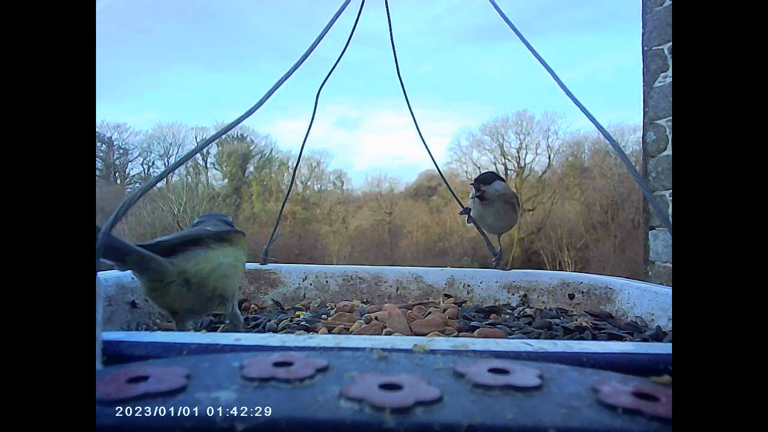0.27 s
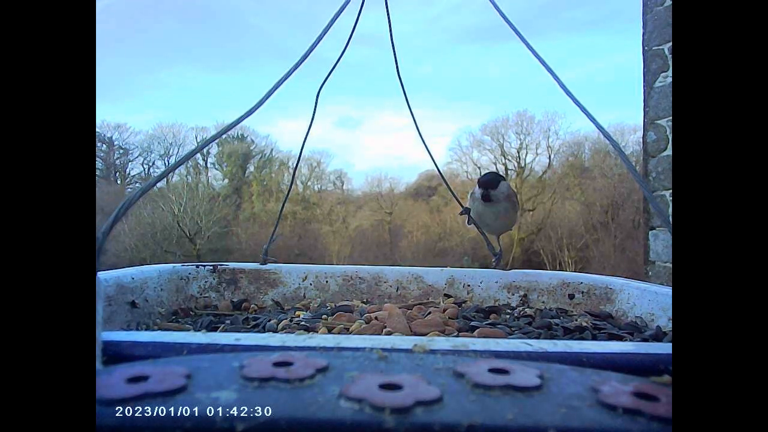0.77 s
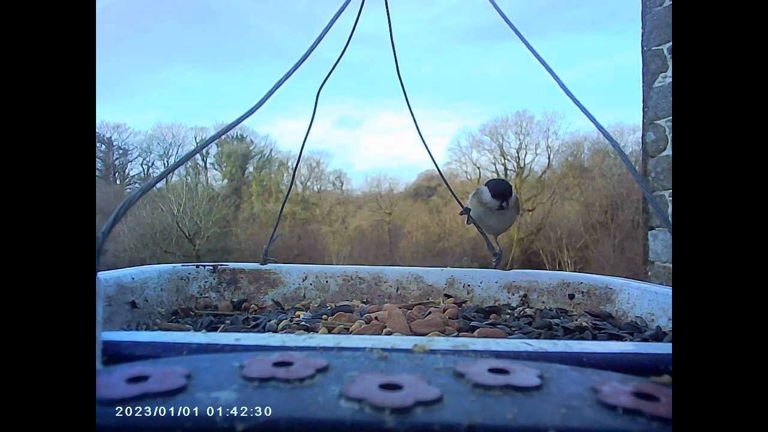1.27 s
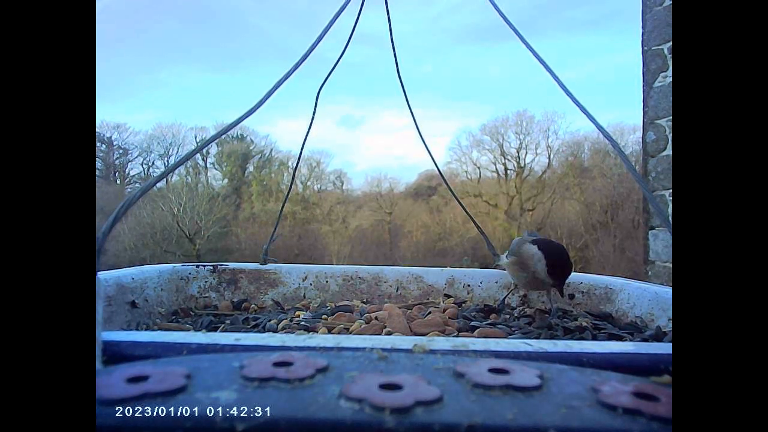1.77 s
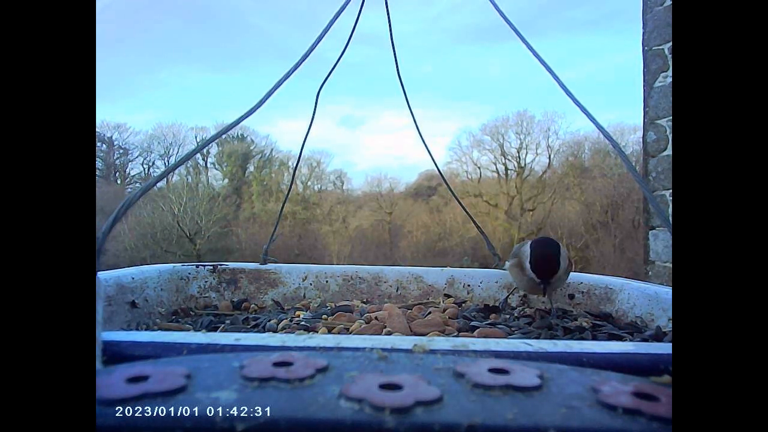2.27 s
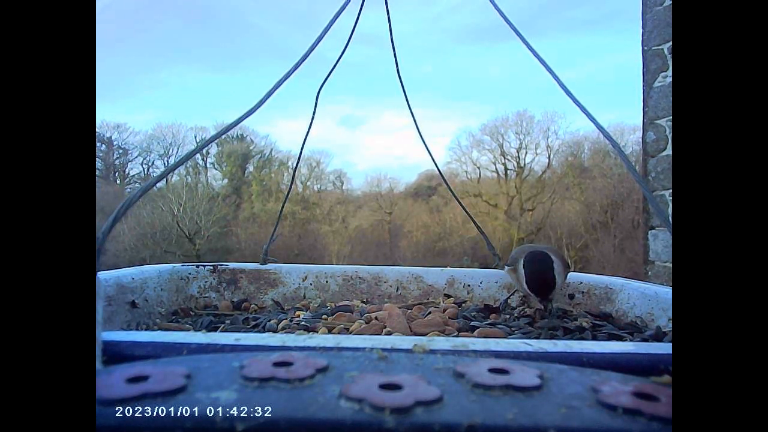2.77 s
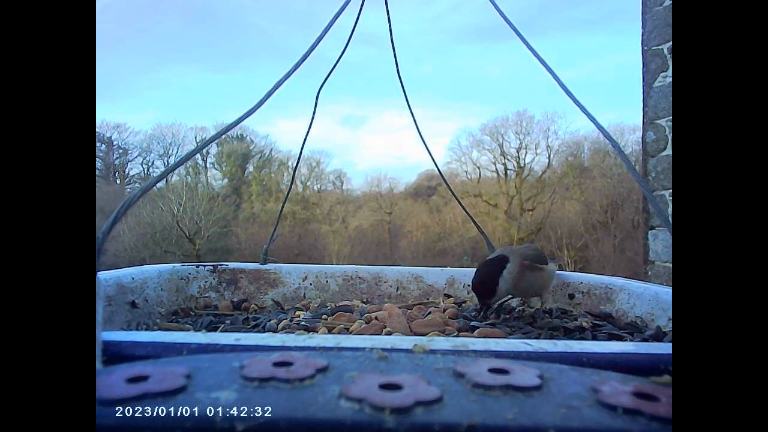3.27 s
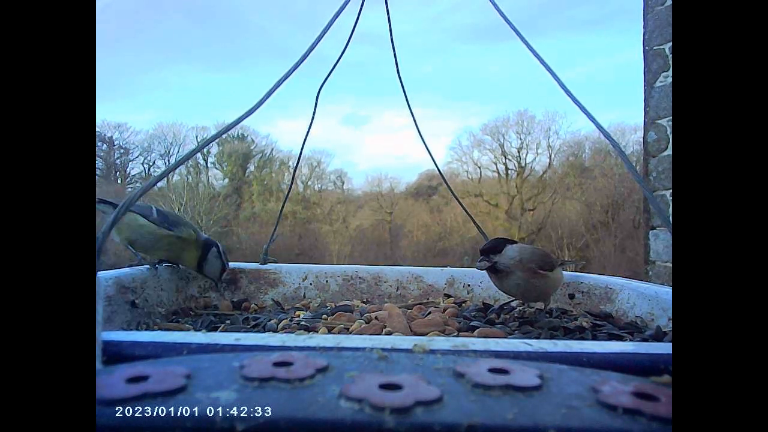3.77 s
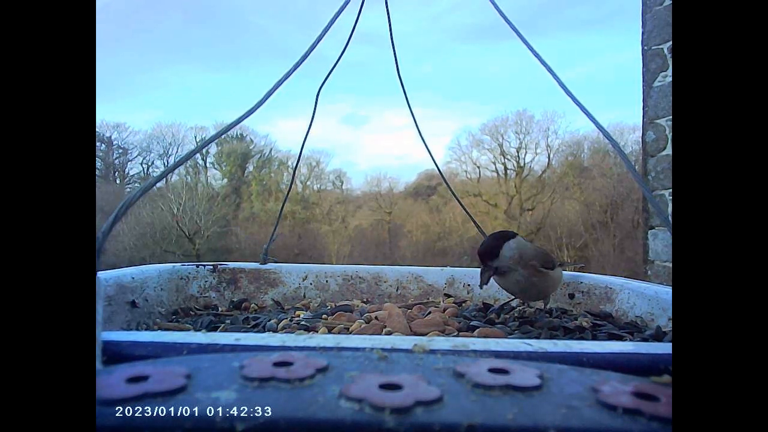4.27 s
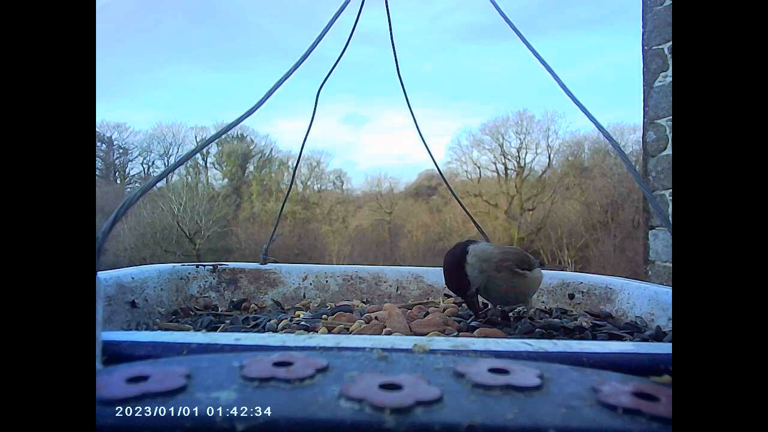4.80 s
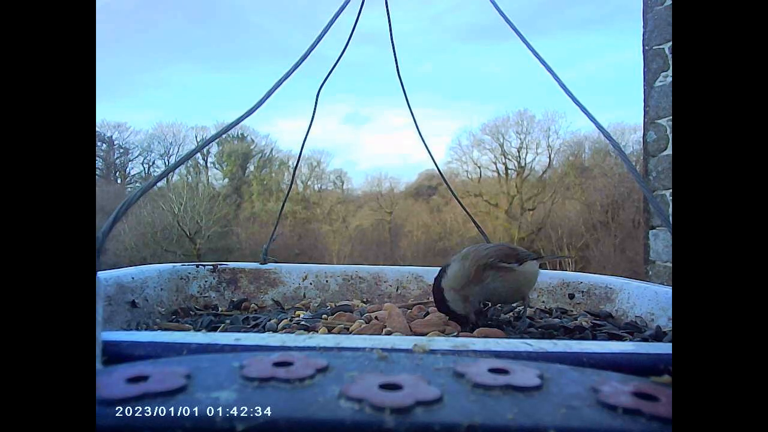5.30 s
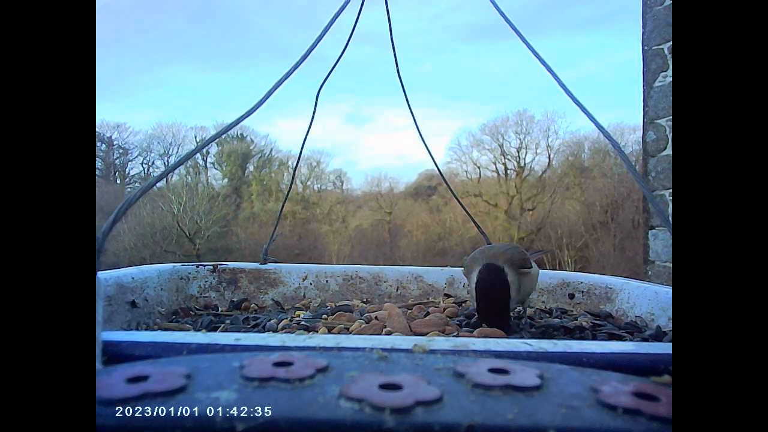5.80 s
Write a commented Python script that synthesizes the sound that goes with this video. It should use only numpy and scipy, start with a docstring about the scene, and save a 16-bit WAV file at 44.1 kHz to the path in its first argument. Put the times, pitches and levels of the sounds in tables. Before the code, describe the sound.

Throughout, soft low air noise, faint camera hiss and a very thin whine lie under distant, high, quick warbling with a slight echo from trees. At 0.1-0.4 s there are faint seed rustles, light touches and a small hoarse call. From 0.45 to 0.8 s wings buffet the microphone in a rapid low flutter. Metallic taps follow at 0.8-1.7 s, brightest with a husk snap near 1.6, and a quiet dipping call at 1.16. Clusters of pecks ring the tin around 2.0-2.2 and 2.6-2.9 s, with a low jolt near 2.7. Dense taps run 3.25-3.95 s: a clear high chirp at 3.4, brief wings, a sharp husk crack at 3.49, rustling and flicked seeds. Another tiny flutter comes at 4.2, then firm knocks at 4.35-4.7 with a low sway. Last taps fall near 5.1, a faint snap at 5.4, then distant song to 6 s.

```python
"""Small birds hop and peck in a hanging metal seed tin, right beside a little camera.
Throughout: light air and camera hiss (shaped noise), a thin whine (sines), a far song (gliding tones).
Soon feet rustle the seed (noise), beaks and claws ring the tin (decaying modes) and husks snap (noise bursts).
Near birds then call (gliding tones), and wings buffet the microphone (pulse trains with noise).
From the middle on, flicked seeds tick (light contacts) and the tin jolts low as it sways (swells of low noise)."""
import sys
import numpy as np
from scipy import signal
from scipy.fft import rfft, irfft, next_fast_len
from scipy.io import wavfile
from scipy.ndimage import map_coordinates

SR = 44100
rng = np.random.default_rng(int(sys.argv[2]) if len(sys.argv) > 2 else 0)


def digitize_waveform(pressure):
    """Quantize a signal to 16-bit integers and store it at the path in sys.argv[1].

    Rows of a 2-D input are taken as channels; values are limited to [-1, 1].
    """
    field = np.atleast_2d(pressure).T
    bounded = np.clip(field, -1, 1)
    quanta = np.round(bounded * 32767).astype(np.int16)
    wavfile.write(sys.argv[1], SR, quanta)


N = 266496
TOP_HZ = 8800  # upper band limit

# Bursts of flight. Each row: first and last beat in seconds, beats per second, strongest moment in seconds
# (held inside the burst), relative level in dB, wake relative to push in dB.
FLIGHTS = [(0.451, 0.793, 23.9, 0.52, -45.5, -11), (3.338, 3.439, 26.4, 3.6, -45, -17.5),
           (4.177, 4.294, 24.5, 4.14, -45.5, -9)]
# A bird shuffles through the seed. Each row: start and end in seconds, relative level in dB,
# seeds flicked (count before rounding).
SHUFFLES = [(0.142, 0.209, -72, 0), (0.31, 0.435, -76.5, 0.5), (3.451, 3.721, -70.5, 2),
            (3.747, 3.866, -67, 0), (3.96, 4.309, -75, 3), (4.885, 4.93, -72.5, 0)]


def amp(db):
    """Decibels to gain."""
    return 10 ** (np.asarray(db) / 20)


def rms(x):
    """Root mean square."""
    return np.sqrt(np.mean(x ** 2) + 1e-24)


def along(points, hz):
    """Interpolate (Hz, value) points on a log frequency axis."""
    point_hz, value = np.transpose(points)
    return np.interp(np.log(hz + 1), np.log(point_hz + 1), value)


def filtered(x, response):
    """Filter x by a gain that is a function of frequency in Hz."""
    m = next_fast_len(len(x) + 8192)
    spectrum = rfft(x, m) * response(np.fft.rfftfreq(m, 1 / SR))
    return irfft(spectrum, m)[:len(x)]


def noise(spectrum, size):
    """Coloured noise of rms 1."""
    x = filtered(rng.standard_normal(size), lambda hz: amp(along(spectrum, hz)))
    return x / rms(x)


def wobble(rate):
    """Smooth random curve with rate knots per second."""
    knots = rng.standard_normal(int(N * rate / SR) + 4)
    return map_coordinates(knots, [np.arange(N) * rate / SR])


def add(track, s, sound):
    """Mix a sound into the track at s seconds."""
    part = track[max(round(s * SR), 0):][:len(sound)]
    part += sound[:len(part)]


def background():
    """Low noise of air, stirred by flights and swelling with jolts of the tin, under camera hiss and whine."""
    # Air spectrum. Each row: frequency in Hz, relative level in dB.
    air_spectrum = [(6, -11), (12, 6.5), (22, 5), (40, -5), (80, -13), (160, -18), (260, -33.5),
                    (450, -23.5), (560, -35), (700, -58.5), (1500, -51.5)]
    # Camera hiss spectrum. Each row: frequency in Hz, relative level in dB.
    hiss_spectrum = [(100, 7), (750, -3), (880, -1), (1050, -3), (1500, 0), (1800, -6.5), (2020, 2),
                     (2300, -2.5), (2600, -2), (3150, -7.5), (3900, -6), (4900, -6.5), (6000, -6.5),
                     (7500, -9.5), (8600, -14.5)]
    # Low jolts as the tin sways under hard pecks. Each row: centre in seconds, half width in seconds, rise in dB.
    jolts = [(2.692, 0.12, 8), (4.64, 0.076, 10.5)]
    # Whine partials. Each row: mean frequency in Hz, rms level in dB.
    whine_partials = [(1409.3, -82), (2818.8, -86), (4228.3, -90.5), (5638, -97.5)]
    breeze_db, stir_db, stir_s = -64.5, 4, 0.26  # calm air; rise around a flight, its time constant
    flutter_hz, flutter_rad = 24.03, 0.73  # phase tremble of the whine

    t = np.arange(N) / SR
    stirred = sum(np.exp(-np.abs(t - np.clip(t, first, last)) / stir_s) for first, last, *_ in FLIGHTS)
    jolts_db = sum(db * np.exp(-((t - s) / width) ** 2) for s, width, db in jolts)
    low_db = breeze_db + stir_db * stirred + jolts_db + 0.32 * wobble(1.9)
    low_noise = amp(low_db) * noise(air_spectrum, size=N)
    hiss = amp(-72.5) * noise(hiss_spectrum, size=N)
    tin_murmur = amp(-76.5) * noise([(100, -3.5), (200, -1.5), (255, -6.5), (300, 2.5), (360, -3),
                                     (460, -0.5), (560, -6.5), (750, -28.5)], size=N)
    drift_rad = 0.082 * wobble(12.0) + flutter_rad * np.sin(2 * np.pi * flutter_hz * t)
    whine = sum(np.sqrt(2) * amp(db) * np.sin(2 * np.pi * hz * t + drift_rad) for hz, db in whine_partials)
    return low_noise + hiss + tin_murmur + whine


def whistles(notes, overtone_db, waver, hold):
    """Notes bend through three pitches with tremor and an octave; more hold lingers on the middle pitch."""
    out, tremor = np.zeros(N + SR), wobble(300)
    for s, length, start_hz, middle_hz, end_hz, db in notes:
        u = np.linspace(0, 1, int(length * SR))
        bend_hz = np.where(u < .5, start_hz - middle_hz, end_hz - middle_hz)
        hz = middle_hz + bend_hz * np.abs(2 * u - 1) ** hold
        shake = 1 + waver * tremor.take(int(s * SR) + np.arange(len(u)), mode="wrap")
        phase = 2 * np.pi * np.cumsum(hz * shake) / SR
        octave = amp(overtone_db) * np.sin(2 * phase) * (2 * hz < TOP_HZ)
        envelope = np.abs(np.sin(np.pi * u)) ** 0.18
        add(out, s, amp(db) * envelope * (np.sin(phase) + octave))
    return out[:N]


def twitter(count):
    """Faint chirps with random pitch bends, scattered through the far song, as rows of notes."""
    chance = rng.random((count, 6))
    s = (np.arange(count) + chance[:, 0]) * N / SR / (count + 1)
    length_s = 0.039 + 0.041 * chance[:, 1]
    pitches_hz = 5000 + 900 * (2 * chance[:, 2:5] - 1)
    return np.column_stack([s, length_s, pitches_hz, -86 + 5 * chance[:, 5]])


def birds():
    """A far warbling song and slightly hoarse near calls; trees scatter both back, the far song more."""
    # Notes of the far song. Each row: start and length in seconds, start, middle and end pitch in Hz,
    # relative level in dB.
    song = [(.04,0.043,4420,5270,4300,-76), (.255,0.021,5230,4900,4400,-77), (.315,.03,4900,4180,4740,-77),
            (.728,.024,4850,5450,6150,-81), (.855,.025,5060,4730,4300,-78), (.955,.03,5220,5700,5500,-81),
            (1.01,0.028,4520,4150,4370,-74.5), (1.095,0.019,5760,5400,5000,-77),
            (1.205,0.03,5000,5750,6700,-77), (1.31,0.023,4560,4600,4850,-78),
            (1.515,.055,4500,4570,5240,-77), (1.68,.04,4440,5040,5300,-80), (1.92,0.036,4940,4960,5160,-77),
            (2.065,.035,5600,4920,4300,-76), (2.135,0.054,5000,5600,4500,-81),
            (2.345,0.054,5400,4900,4400,-78.5), (2.465,0.03,4700,4700,4850,-74),
            (2.86,0.039,5650,5300,4550,-76.5), (2.965,0.016,5400,5700,5130,-78),
            (3.02,.065,4900,5700,4170,-79), (3.115,0.022,4870,5310,4940,-80),
            (3.18,0.068,5240,4510,5270,-76), (3.492,0.025,4900,5400,5640,-73),
            (3.645,0.091,4430,4680,4560,-80.5), (4.035,.075,4440,4990,4330,-74),
            (4.155,.02,4500,4940,5370,-77), (4.26,0.021,4900,4600,4650,-80), (4.3,.025,5500,4800,4600,-82),
            (4.385,0.033,5460,5700,5500,-79), (4.485,.04,4780,4980,5700,-80),
            (4.68,0.031,5840,5420,5230,-82), (4.87,.05,5300,4900,5170,-84), (5.055,.025,4490,4330,4300,-79),
            (5.155,0.021,5400,5250,5030,-85), (5.205,0.054,4700,4560,5440,-79),
            (5.328,0.053,4750,4900,5140,-75), (5.378,0.039,4900,4760,5400,-74),
            (5.53,0.037,5070,5450,5100,-78), (5.612,0.065,5600,4860,4500,-73.5),
            (5.66,0.054,4180,4830,5200,-75.5), (5.78,0.027,4640,4820,5250,-73),
            (5.865,0.056,5350,4770,5350,-77.5), (5.925,0.046,4900,4500,4450,-84),
            (5.99,.025,4900,4800,4650,-79)]
    # Near call shapes by name: start, middle and end pitch in Hz.
    call_shapes = {"tick": (5400, 6750, 7000), "dip": (4500, 3560, 3560), "arch": (5650, 8200, 6900)}
    # Near calls. Each row: start and length in seconds, shape name, relative level in dB.
    near_calls = [(0.306, 0.01, "tick", -74), (0.357, 0.046, "dip", -69), (1.159, .05, "dip", -69.5),
                  (1.835, 0.043, "dip", -72), (2.616, 0.038, "arch", -68.5), (2.83, 0.02, "tick", -78.5),
                  (3.409, .035, "arch", -58), (4.17, 0.015, "tick", -75.5)]
    # Rough second voice of a dipping call: start, middle and end pitch in Hz.
    dip_upper_hz = (5600, 4300, 4900)
    near_echo_db, far_echo_db, trees_t60_s = -15.5, -8.5, 0.27

    far = whistles([*song, *twitter(count=70)], overtone_db=-40, waver=.018, hold=1.2)
    far *= amp(2.6 * wobble(250) - .7)

    calls = [(s, length, *call_shapes[shape], db) for s, length, shape, db in near_calls]
    upper = [(s, length, *dip_upper_hz, db - 3.5) for s, length, shape, db in near_calls if shape == "dip"]
    hoarse = amp(1.9 * wobble(1100) + 0.5)
    lower_voice = whistles(calls, overtone_db=-12.0, waver=0.012, hold=2.6)
    upper_voice = whistles(upper, overtone_db=-44, waver=.07, hold=2.1)
    near = hoarse * (lower_voice + upper_voice)

    t = np.arange(SR // 2) / SR
    trees = rng.standard_normal(len(t)) * amp(-60 * t / trees_t60_s)
    to_trees = amp(near_echo_db) * near + amp(far_echo_db) * far
    echo = signal.fftconvolve(to_trees, trees / np.linalg.norm(trees))[:N]
    return near + far + echo


def shuffles():
    """Feet and beak push seed aside: a soft, uneven noise rustle on the tin floor."""
    # Seed rustle spectrum. Each row: frequency in Hz, relative level in dB.
    seed_bed = [(280, -32), (450, 20), (560, -23), (680, 1.5), (900, 1.5), (1300, -15), (2500, -35),
                (6000, -35)]
    out = np.zeros(N)
    for start, end, db, _ in SHUFFLES:
        stroke = signal.windows.tukey(int((end - start) * SR), .5)
        add(out, start, amp(db) * stroke)
    return out * amp(5.2 * wobble(45)) * noise(seed_bed, size=N)


def ring(t, lo, hi, press, scatter_db, phase_spread):
    """Tin modes from lo to hi Hz swell over press seconds, then die; each contact reweights and detunes them."""
    # The tin's modes. Each row: nominal frequency in Hz, relative level in dB, t60 in seconds.
    tin = [(195.2, -10, 1.14), (300.2, -14.5, 0.83), (321.4, -15, 0.41), (408.2, -8, .4),
           (454, -7.5, 0.084), (486.7, 0, 0.33), (538.5, -5, 0.22), (583, -14.5, .45), (644.6, -6, 0.11),
           (690, -2.5, 0.21), (879, -11.5, 0.24), (922, -4, 0.21), (958, -11, 0.2), (1090, -19, .29),
           (1172, -19.5, 0.087), (1394, -13.5, .2), (1732, 4, 0.12), (1712, -7.5, 0.11), (1960, -16.5, .16),
           (2180, -8, .19), (2301, 6, 0.083), (2356, 1, .1), (2440, 2.5, 0.087), (2474, -1, 0.093),
           (2690, -11.5, 0.062), (2890, -10.5, 0.25), (3040, -11, 0.055), (3470, -12, 0.1)]
    hz, db, t60 = np.transpose([m for m in tin if lo <= m[0] < hi])[:, :, None]
    decay_db = -60 * np.maximum(t - press, 0) / t60
    level = amp(db + scatter_db * rng.standard_normal(hz.shape) + decay_db)
    detune = 1 + 0.004 * rng.standard_normal(hz.shape)
    cycles = hz * detune * t + phase_spread * rng.random(hz.shape)
    x = np.sum(level * np.sin(2 * np.pi * cycles), axis=0)
    swell = np.sin(np.pi / 2 * np.minimum(t / press, 1))
    return x / rms(x[t < press + .015]) * swell


def contact(boom_db, side_db, clang_db, bright_db, press):
    """A contact rasps and rings the rim at once; floor and walls swell with the push and shake loose seed."""
    # Husk rasp spectrum. Each row: frequency in Hz, relative level in dB.
    rasp_spectrum = [(300, -6.5), (1300, -13.5), (2000, -17.5), (2450, 0), (2950, -21.5), (4000, -22),
                     (7500, -33.5)]
    # Loose seed on the tin floor, spectrum. Each row: frequency in Hz, relative level in dB.
    rattle_spectrum = [(250, -11), (450, 4.5), (600, -2.5), (770, -20), (930, -7), (1200, -15.5),
                       (1750, -22), (2400, -10.5), (3000, -29.5), (6000, -40)]
    t = np.arange(SR // 3) / SR
    boom = amp(boom_db - 6) * ring(t, lo=0, hi=800, press=press, scatter_db=2.0, phase_spread=0.79)
    side = amp(side_db - 5) * ring(t, lo=800, hi=1550, press=press, scatter_db=3.5, phase_spread=0.78)
    clang = amp(clang_db - 5.0) * ring(t, lo=1550, hi=1900, press=press, scatter_db=0.0, phase_spread=0.05)
    bright = amp(bright_db - 7.5) * ring(t, lo=1900, hi=SR, press=0.00084, scatter_db=1.5, phase_spread=0.93)

    rasp = amp(bright_db + 1.5 - 60 * t / (0.033 + 1.1 * press)) * (1 - np.exp(-t / 0.00067))
    rasp *= noise(rasp_spectrum, size=len(t))

    grains = rng.standard_normal(len(t)) * (rng.random(len(t)) < 700 / SR)  # about 700 per second
    rattle = filtered(grains, lambda hz: amp(along(rattle_spectrum, hz)))
    rattle *= amp(boom_db - 1.5 - 60 * t / 0.13) * (1 - np.exp(-t / press)) / rms(rattle)
    return boom + side + clang + bright + rasp + rattle


def taps():
    """Beaks and claws strike the tin in quick clusters, some hard, some dragging through the seed."""
    # Touches of beak and claw. Each row: start in seconds, relative levels in dB of floor boom, side ring,
    # wall clang and bright rim, push build-up in seconds.
    touches = [(.152,-67,-72,-87,-85,0.0034), (0.319,-67.5,-70,-93,-85,0.007),
               (.504,-67.5,-69,-76,-71,0.0053), (0.5243,-74,-83,-70,-73,.01),
               (0.7188,-65.5,-66,-73,-61,0.0079), (.819,-51,-54,-61,-68,0.0056),
               (0.885,-57,-58.5,-56,-62.5,0.0059), (1.191,-54.5,-65,-68,-65,0.0075),
               (1.237,-57,-60.5,-55.5,-60,0.0021), (1.4171,-62,-84,-71,-63.5,0.022),
               (1.459,-64,-63,-57.5,-53.5,0.0056), (1.591,-55,-58,-83,-61,0.0019),
               (1.6113,-50.5,-58,-50,-46.5,0.006), (1.661,-56,-64.5,-60.5,-57,0.004),
               (1.954,-52,-61.5,-60,-79,0.0024), (1.967,-68,-61.5,-82,-61,0.0078),
               (2.052,-54,-58,-66.5,-62.5,0.0072), (2.095,-69,-70,-72,-65,0.0098),
               (2.1767,-53.5,-70,-70,-58.5,0.0053), (2.217,-60.5,-64,-65,-55,0.012),
               (2.6199,-48,-56.5,-57.5,-55,0.014), (2.652,-59,-71,-83,-75,0.0052),
               (2.668,-74,-62.5,-71,-63,0.0038), (2.735,-53.5,-61,-66.5,-57.5,0.0049),
               (2.761,-60,-57,-68,-70,0.016), (2.78,-53,-60,-55.5,-63,0.011), (2.822,-68,-68,-84,-66,0.011),
               (2.893,-54,-62,-60,-59.5,0.02), (2.929,-60.5,-62,-60.5,-60.5,0.0073),
               (3.253,-56,-62,-56.5,-59.5,0.029), (3.287,-66.5,-56.5,-65,-62.5,0.015),
               (3.343,-70,-79,-85,-65.5,.006), (3.386,-55,-58.5,-64.5,-61,0.024),
               (3.42,-73,-61,-72,-64,0.016), (3.474,-65,-73,-76,-55,0.0072), (3.5231,-63,-74,-74,-66,0.019),
               (3.547,-70,-70,-60,-59.5,0.0092), (3.563,-57.5,-70,-87,-65.5,0.012),
               (3.594,-66.5,-77,-86,-61,.006), (3.719,-52.5,-66,-72,-62.5,0.026),
               (3.7531,-51.5,-59,-67,-57.5,0.0064), (3.772,-58,-65,-62.5,-63,0.023),
               (3.7926,-63,-62.5,-71,-65,0.011), (3.8869,-56.5,-57.5,-62,-63,0.012),
               (3.92,-61,-63.5,-63,-66,0.0046), (3.945,-63,-68,-70,-60,0.0037),
               (4.1461,-74,-75,-88,-62.5,0.0075), (4.3526,-48.5,-61.5,-61,-64,0.0094),
               (4.369,-59,-61,-73,-76,0.018), (4.48,-61.5,-72,-71,-70,0.0049),
               (4.501,-56,-60,-76,-69,0.0092), (4.542,-71,-71,-72,-68,0.0053),
               (4.6225,-55.5,-64,-67,-55.5,0.0054), (4.643,-54.5,-56.5,-62.5,-73,0.0049),
               (4.692,-61.5,-68,-77,-63,0.004), (5.0846,-52.5,-62,-63,-61,0.0073),
               (5.112,-59,-61.5,-73,-82,0.033), (5.133,-67,-75,-68,-64.5,0.0059)]
    out = np.zeros(N)
    for s, *touch in touches:
        add(out, s, contact(*touch))
    return out


def snaps():
    """Husks creak around a crack of a few milliseconds; the beak knocks through to the damped floor."""
    # Dry husk snaps. Each row: time in seconds, relative level in dB, relative floor knock in dB.
    husk_snaps = [(0.211, -66, -81), (1.591, -52.5, -67), (1.614, -61, -70), (3.4867, -44, -50),
                  (3.5631, -59, -64), (3.7547, -56.5, -46.5), (5.431, -68, -78)]
    # Husk spectrum. Each row: frequency in Hz, relative level in dB.
    husk = [(200, -45), (550, 17.5), (1200, 16.5), (2200, 4), (3000, 0), (4500, 4.5), (6000, 0.5),
            (8000, -9)]
    damping_t60_s = 0.079  # added to the floor's own decay: beak presses a seed on it
    out, t, after = np.zeros(N), np.arange(-SR // 32, SR // 32) / SR, np.arange(SR // 8) / SR
    for s, db, knock_db in husk_snaps:
        crack = amp(db - 5.0 - 60 * np.abs(t) / np.where(t < 0, .003, .012))
        creak = amp(db - 12 - 60 * np.abs(t) / 0.041)
        add(out, s + t[0], (crack + creak) * noise(husk, size=len(t)))
        floor = ring(after, lo=430, hi=1000, press=0.0026, scatter_db=4, phase_spread=0.86)
        add(out, s - .002, amp(knock_db - 2 - 60 * after / damping_t60_s) * floor)
    return out


def wings():
    """Each downstroke pushes a pulse of air; its wake flutters on the microphone between pushes."""
    out, t = np.zeros(N), np.arange(N) / SR
    for first, last, rate, strongest, db, wake_db in FLIGHTS:
        nearest = np.clip(strongest, first + .02, last - .02)
        nearness = np.interp(t, [first - .03, first, nearest, last, last + .025], [0, .55, 1, .42, 0])
        turn = 2 * np.pi * rate * (t - first) + 0.24 * wobble(60)  # uneven beats
        push = np.exp(1.9 * (np.cos(turn) - 1))
        push = (push - push.mean()) / push.std()
        eddies = noise([(20, -22.0), (90, -9.5), (260, -10.5), (600, -27), (1500, -34), (6000, -58)], size=N)
        wake = amp(wake_db) * eddies * np.exp(-2.2 * (np.cos(turn - .6) + 1))
        rumble = noise([(15, -9.5), (45, -4), (90, -4.0), (180, -18), (400, -42.0), (1500, -78)], size=N)
        buffet = amp(-12.5) * rumble
        out += amp(db - 1.5 + 1.2 * wobble(25.04)) * nearness * (push + wake + buffet)
    return out


def ticks():
    """While a bird shuffles, stray seeds make light contacts with the tin."""
    tick_db, tick_spread_db = 8.5, -1.5  # offset from the shuffle level, random scatter
    out = np.zeros(N)
    for start, end, db, seeds in SHUFFLES:
        count = round(seeds)
        for k in range(count):
            level = db + tick_db + tick_spread_db * rng.standard_normal()
            s = start + (end - start) * (k + rng.random()) / count
            add(out, s, contact(level - 4.5, level - 9.0, level - 35, level - 12.5, press=.008))
    return out


def scene():
    """Everything at one microphone."""
    return (background() + birds() + shuffles() + taps() + snaps() + wings() + ticks())[None]


def record(dry):
    """The camera's low sample rate mirrors the highest sounds about its band edge; its converter sits off zero."""
    # Camera roll-off. Each row: frequency in Hz, gain in dB.
    roll_off = [(7300, -1), (7700, -5.5), (8000, -8), (8400, -17), (8800, -16.5)]
    camera_rate_hz, converter_offset = 16000, .0052
    heard = filtered(dry[0], lambda hz: hz < TOP_HZ)
    mirrored = heard * (1 + 2 * np.cos(2 * np.pi * camera_rate_hz * np.arange(N) / SR))
    rolled_off = filtered(mirrored, lambda hz: amp(along(roll_off, hz)) * (hz < TOP_HZ))
    return converter_offset + rolled_off[None]


dry = scene()
out = record(dry)
digitize_waveform(out)
```